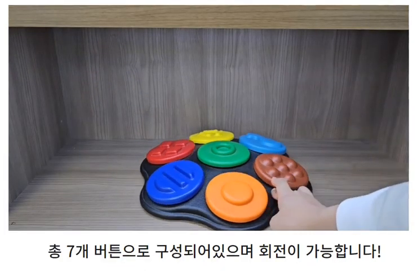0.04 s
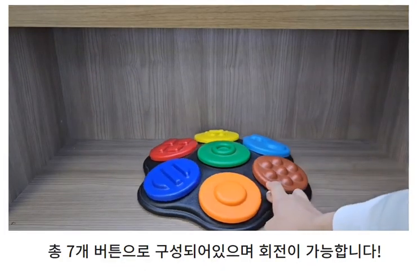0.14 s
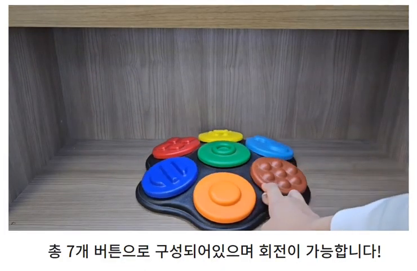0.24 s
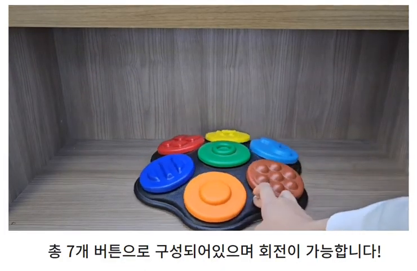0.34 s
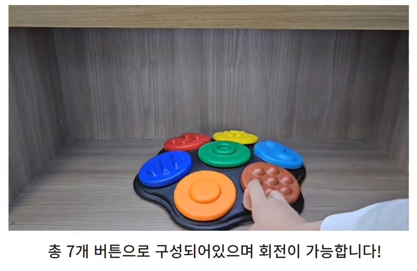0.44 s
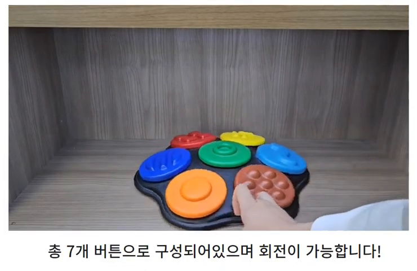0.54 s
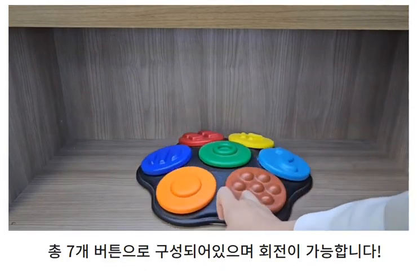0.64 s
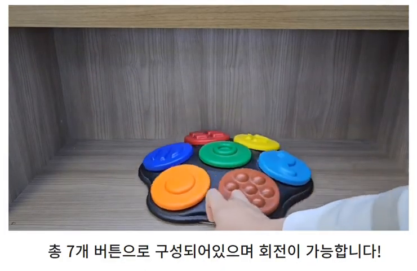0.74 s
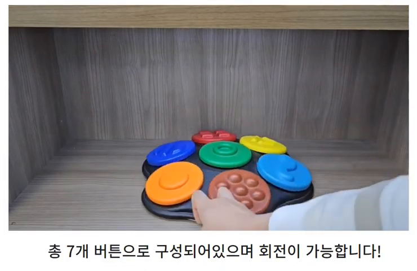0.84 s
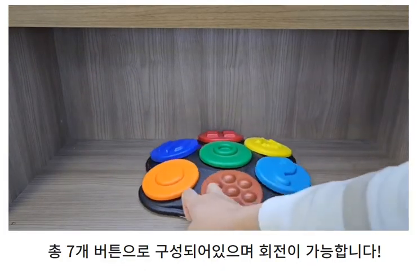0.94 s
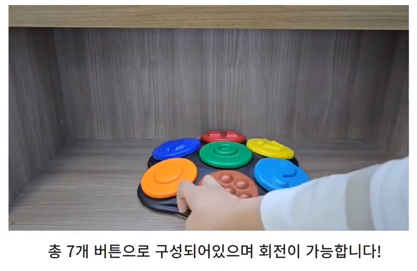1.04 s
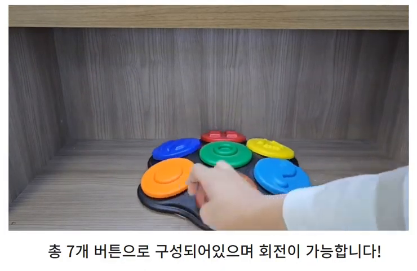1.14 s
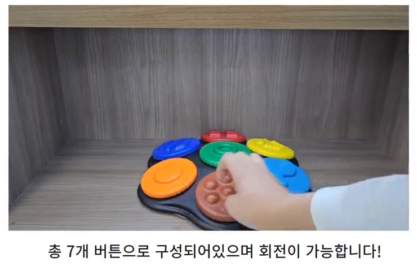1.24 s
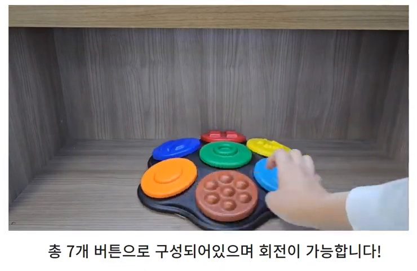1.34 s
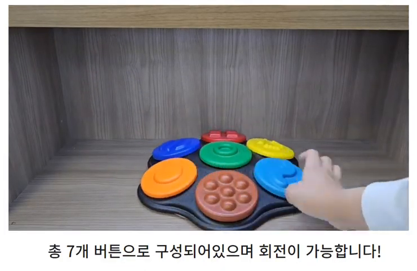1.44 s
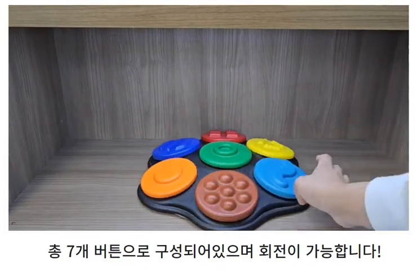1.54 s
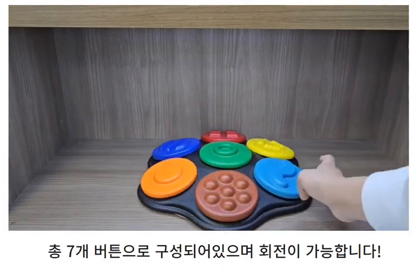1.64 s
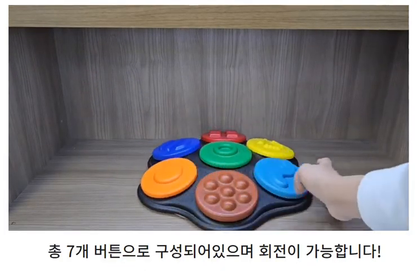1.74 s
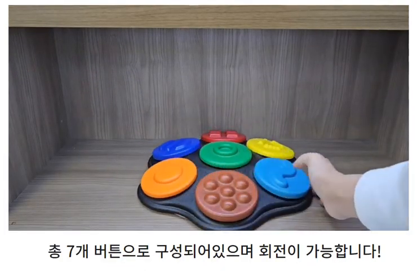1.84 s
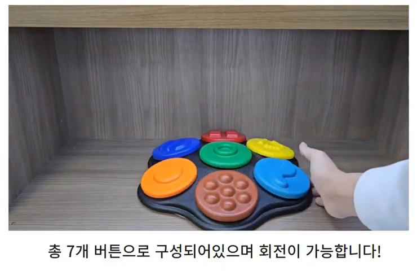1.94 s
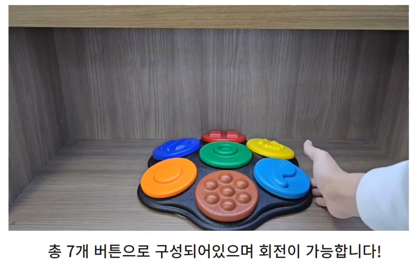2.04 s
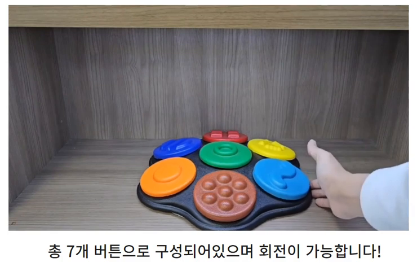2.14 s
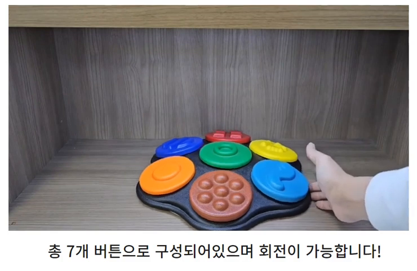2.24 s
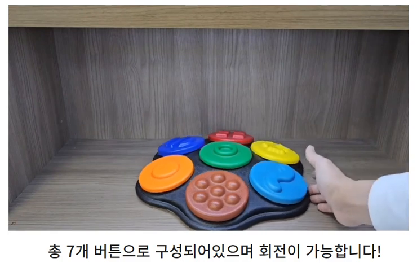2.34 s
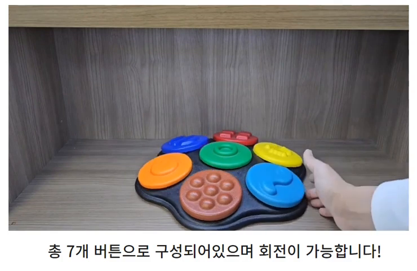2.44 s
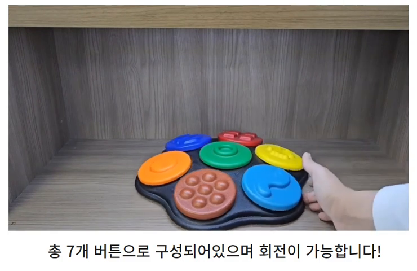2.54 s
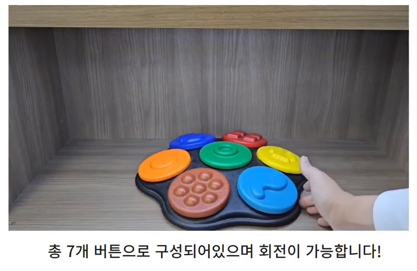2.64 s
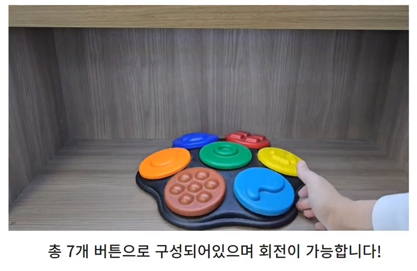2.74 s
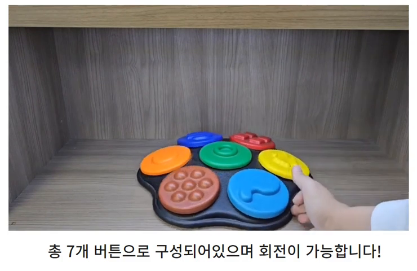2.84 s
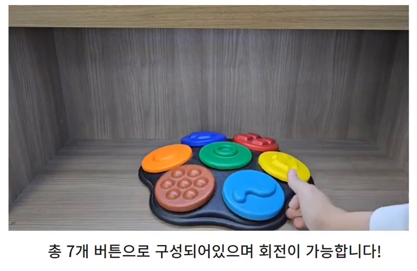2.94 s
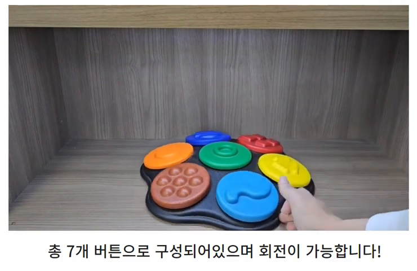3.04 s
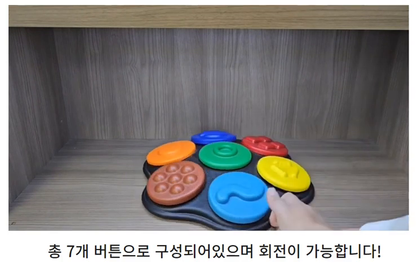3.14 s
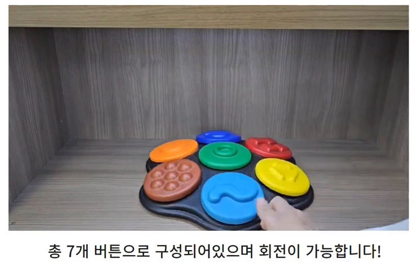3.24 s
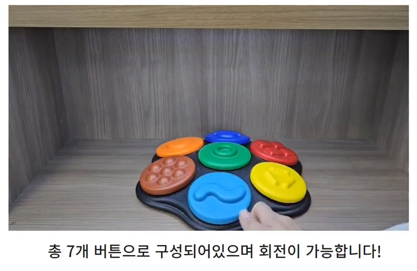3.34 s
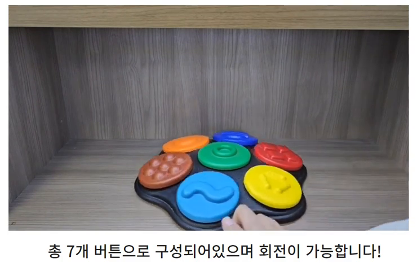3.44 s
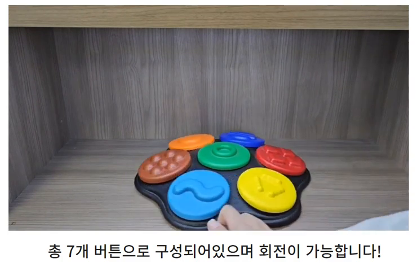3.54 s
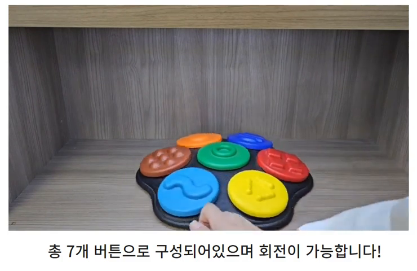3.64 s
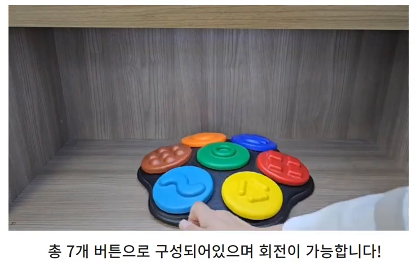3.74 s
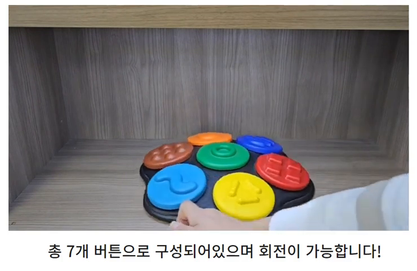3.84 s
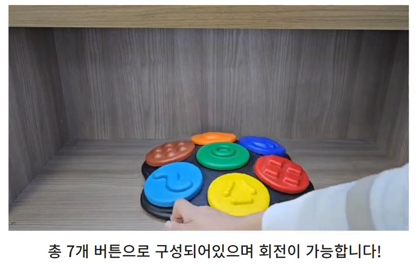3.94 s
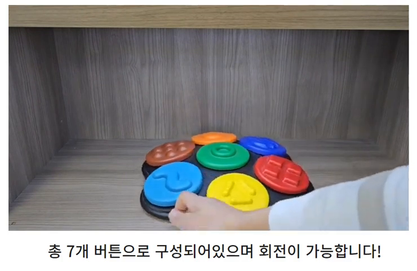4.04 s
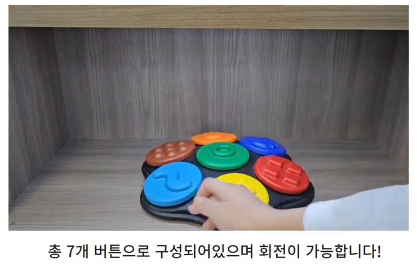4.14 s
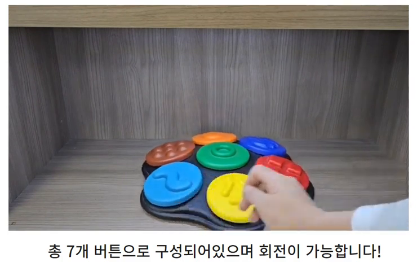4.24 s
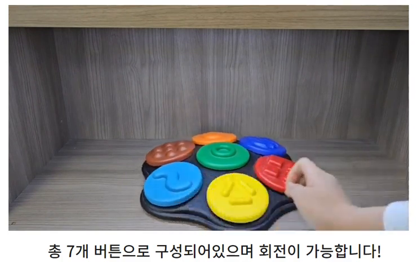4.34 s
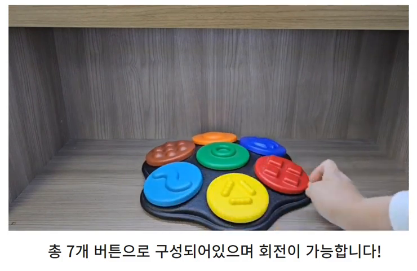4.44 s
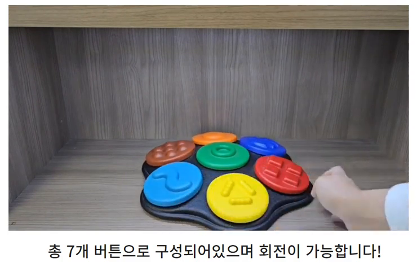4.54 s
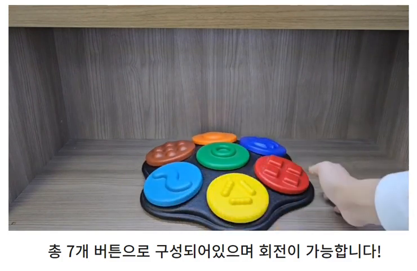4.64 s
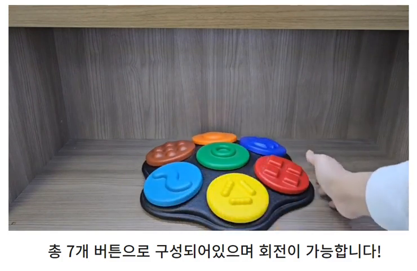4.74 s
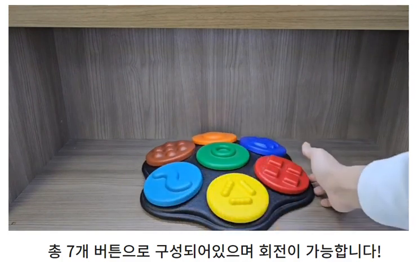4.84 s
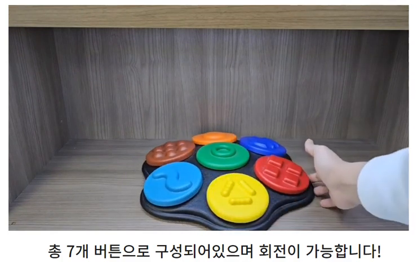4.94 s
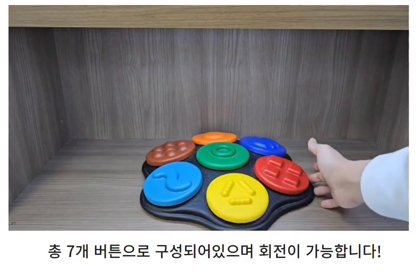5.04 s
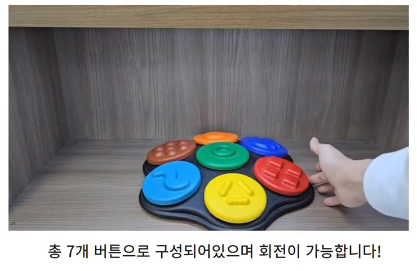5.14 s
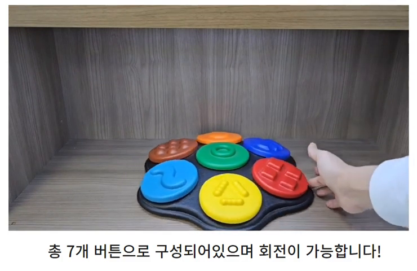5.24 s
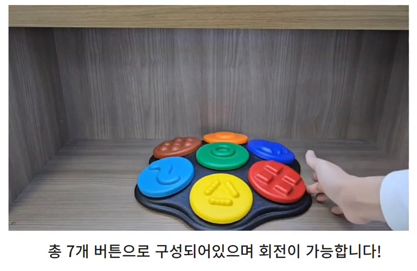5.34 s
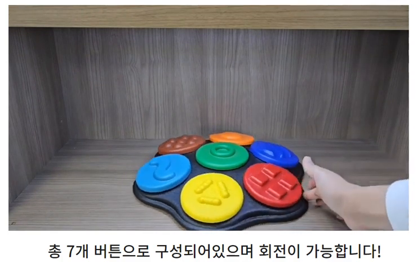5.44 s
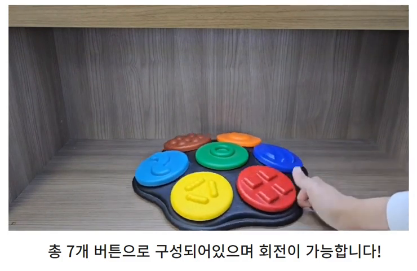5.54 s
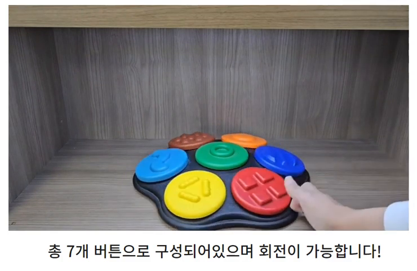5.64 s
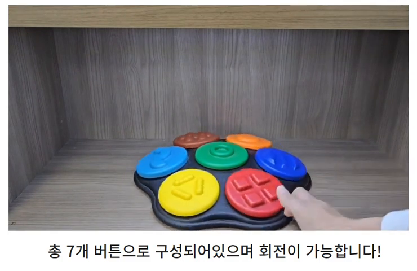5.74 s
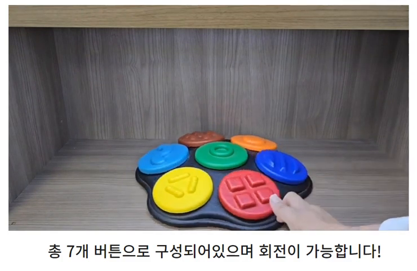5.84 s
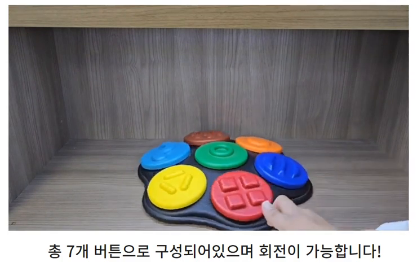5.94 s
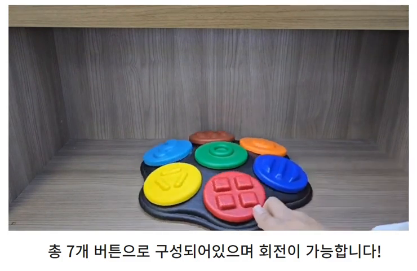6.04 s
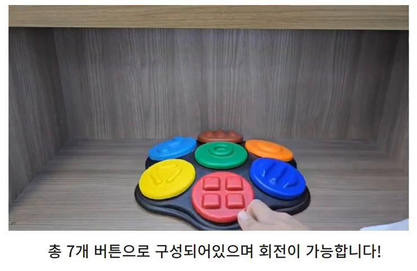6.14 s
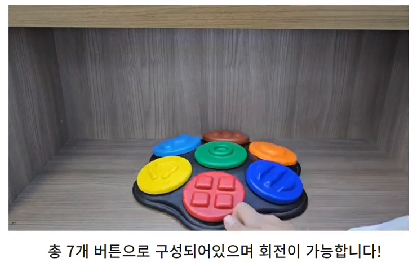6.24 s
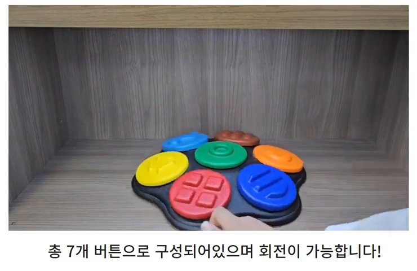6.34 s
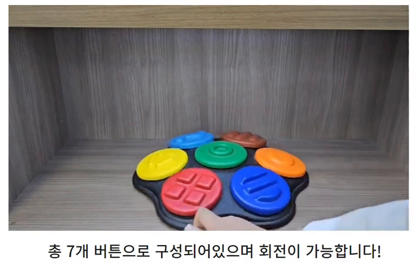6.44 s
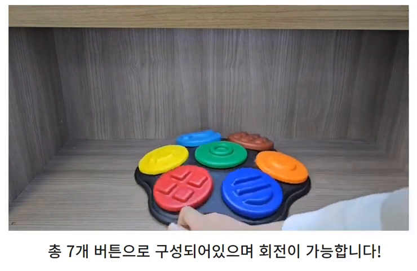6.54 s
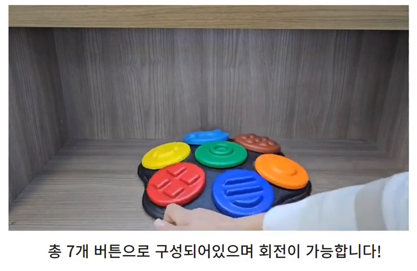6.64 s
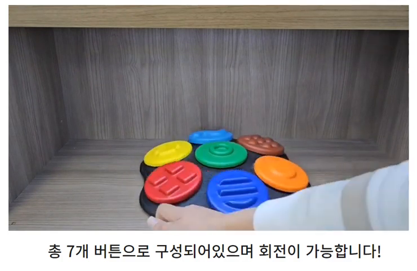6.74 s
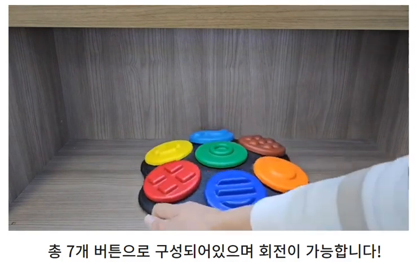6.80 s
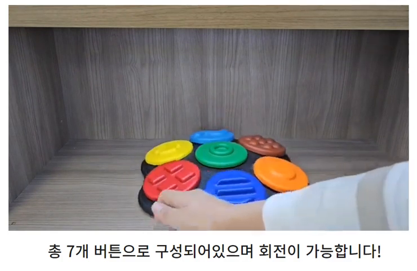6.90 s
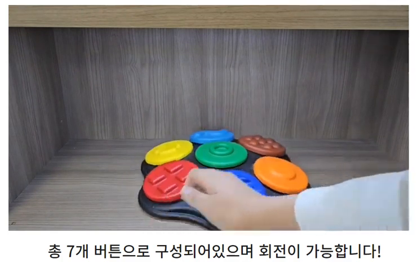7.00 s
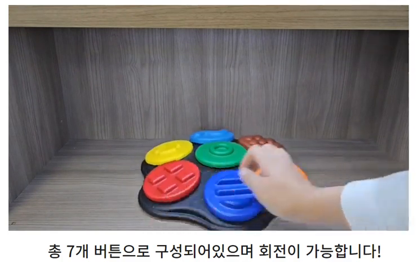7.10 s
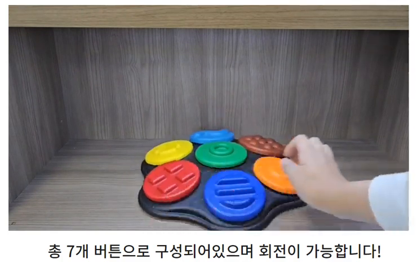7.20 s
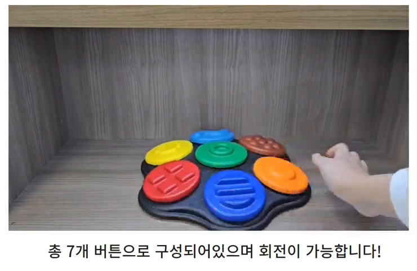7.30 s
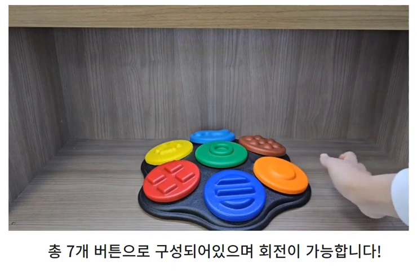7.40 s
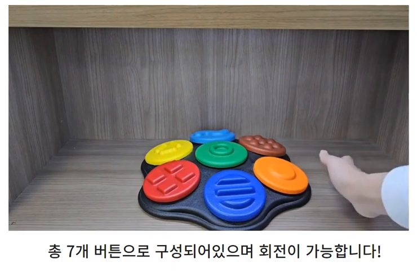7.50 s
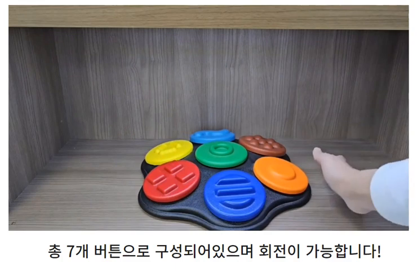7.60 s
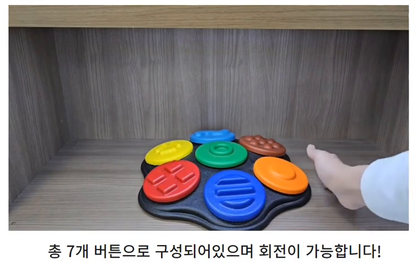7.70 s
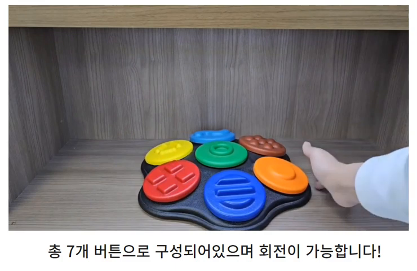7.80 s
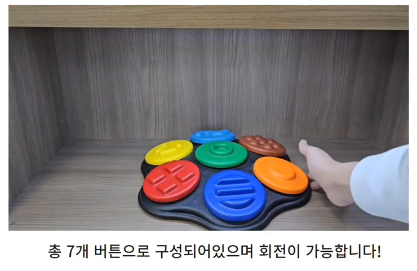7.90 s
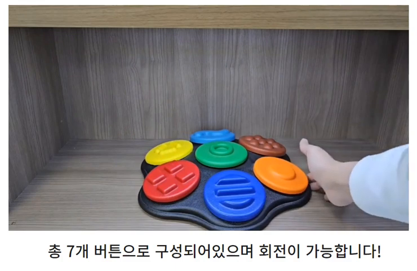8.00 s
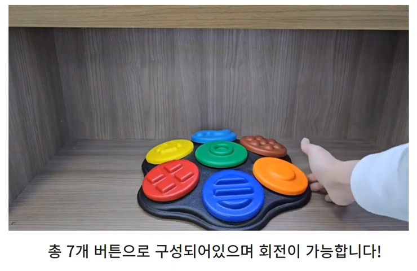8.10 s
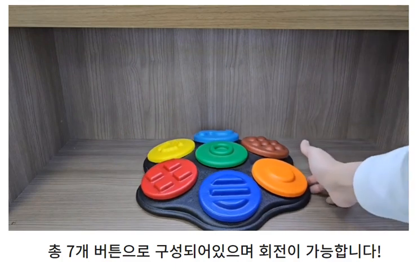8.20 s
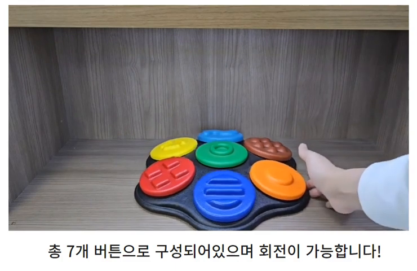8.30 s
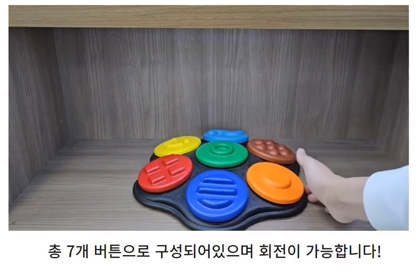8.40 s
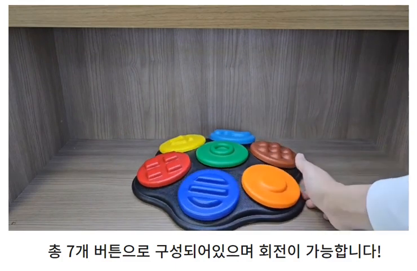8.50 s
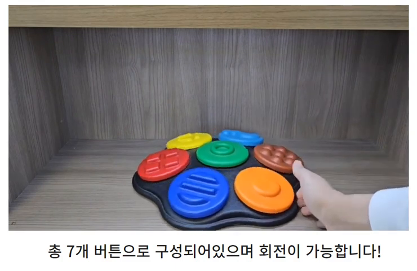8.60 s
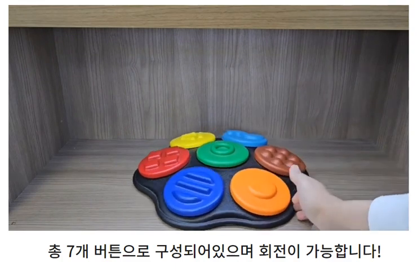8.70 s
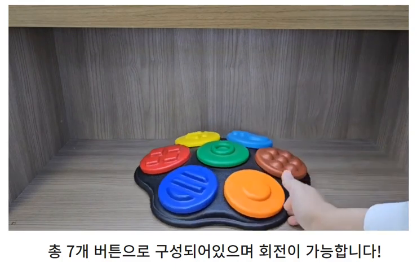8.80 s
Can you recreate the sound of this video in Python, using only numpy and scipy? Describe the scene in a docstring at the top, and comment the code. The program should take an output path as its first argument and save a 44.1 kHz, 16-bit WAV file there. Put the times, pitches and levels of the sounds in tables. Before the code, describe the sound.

Close by, a hollow plastic toy grates over a wooden shelf as a hand rotates it. The rough scrape stutters, ticks and makes the board rumble, then stalls, leaving faint room noise. Three more turns follow, the last two each preceded by a soft brush of skin on plastic. The cabinet walls around it add a very short, boxy reflection.

```python
"""A gritty, hollow scrape: a large plastic disc is dragged round by hand on a wooden shelf, four times.
Its feet stutter over the grain, catch and slip, ringing the hollow body and shaking the shelf into a boom.
A faint low room noise fills the pauses, and a thumb brushes the plastic before the last two pushes.
The walls of the cabinet around the shelf scatter the scrape and the brush into a short, dense tail."""
import sys
import numpy as np
from scipy import signal
from scipy.fft import rfft, irfft, next_fast_len
from scipy.io import wavfile
from scipy.ndimage import uniform_filter1d

SR = 44100
rng = np.random.default_rng(int(sys.argv[2]) if len(sys.argv) > 2 else 0)


def put_to_file(sound):
    """Save the sound as 16-bit audio at rate SR, in the file named by the first command-line argument."""
    columns = np.atleast_2d(sound).T  # one column per channel
    safe = np.clip(columns, -1, 1)
    whole_steps = np.round(safe * 32767)
    wavfile.write(sys.argv[1], SR, whole_steps.astype(np.int16))


N = 390726
T = np.arange(N) / SR
USUAL_DB = -40  # an ordinary scrape; "harder" counts dB above it
# The disc sits to the left: (frequency [Hz], left minus right [dB])
DISC_LEAN = [(60, -1.5), (120, -3.5), (240, 3.5), (480, 4), (950, 4.5), (1890, 3), (3770, 3), (7520, 5.5),
             (15000, 10)]


def gain_of(db):
    return 10 ** (np.asarray(db) / 20)


def evened(x):
    """Scales x to rms 1."""
    return x / np.sqrt(np.mean(x ** 2) + 1e-20)


def read(points, hz):
    """Value of a spectrum table at hz."""
    f, value = np.transpose(points)
    return np.interp(np.log(hz + 1), np.log(f + 1), value)


def columns(strokes):
    """A gate that is open during the strokes, and their columns at every sample."""
    rows = np.concatenate(strokes)
    gate = sum((T >= stroke[0][0]) & (T <= stroke[-1][0]) for stroke in strokes)
    return uniform_filter1d(1. * gate, size=400), [np.interp(T, rows[:, 0], c) for c in rows.T[1:]]


def coloured(x, db_at):
    """Filters x by a gain in dB given as a function of frequency."""
    size = next_fast_len(N)
    return irfft(rfft(x, size) * gain_of(db_at(np.fft.rfftfreq(size, 1 / SR))), size)[..., :N]


def split(x, hz):
    """Low and high part of x, meeting at hz."""
    low = signal.sosfiltfilt(signal.butter(3, hz, fs=SR, output="sos"), x)
    return low, x - low


def pair(left, other, correlation):
    """Two channels from two unrelated signals, as alike as the correlation table says."""
    alike = np.clip(read(correlation, np.fft.rfftfreq(len(left), 1 / SR)), -.99, .99)
    right = irfft(alike * rfft(left) + np.sqrt(1 - alike ** 2) * rfft(other), len(left))
    return np.array([left, right])


def leaning(x, lean):
    """Shares a left-right level difference between the channels."""
    return coloured(x, lambda hz: np.outer([.5, -.5], read(lean, hz)))


def wander(fastest_hz):
    """Slow random drift of rms 1."""
    rates = np.geomspace(fastest_hz / 8, fastest_hz, num=16)
    coarse = T[::64]
    drift = sum(np.sin(2 * np.pi * (hz * coarse + phase)) for hz, phase in zip(rates, rng.random(16)))
    return np.interp(T, coarse, evened(drift))


def grains(per_s, spread_db):
    """Tiny impacts of random sign at random moments, a few of them large."""
    when, size, sign = rng.random(N), rng.exponential(1, N), rng.standard_normal(N)
    return evened((when < per_s / SR) * gain_of(spread_db * np.minimum(size, 5)) * sign)


def shifting(x, depth_db, seconds, width_hz):
    """Makes the colour drift in random patches of time and pitch."""
    spectra = signal.stft(x, nperseg=512, noverlap=384)[2]
    both, left, right = rng.standard_normal((3, *spectra.shape[1:]))
    patches = np.array([both + 0.95 * left, both + right])
    for _ in range(2):
        patches = uniform_filter1d(patches, size=max(round(seconds * SR / 128), 1), axis=2)
        patches = uniform_filter1d(patches, size=max(round(width_hz * 512 / SR), 1), axis=1)
    patch_gain = evened(gain_of(depth_db * evened(patches)))
    return signal.istft(spectra * patch_gain, nperseg=512, noverlap=384)[1][:, :N]


def disc_motion():
    """The four turns: a gate that also fades as the disc stalls, the plain gate, and the scrape level."""
    # How hard the feet grate, one list a turn: (time [s], level [dB])
    turns = [
        [(0.0, -56.5), (0.03, -48.5), (0.29, -37), (0.616, -35.5), (0.674, -40.5), (0.69, -38), (0.87, -39.5),
         (0.898, -44), (0.976, -41), (1.02, -49.5), (1.09, -38), (1.2, -44), (1.224, -35.5), (1.268, -49.5),
         (1.296, -36), (1.33, -44.5), (1.41, -77)],
        [(2.33, -99), (2.41, -49.5), (2.45, -45.5), (2.86, -33), (3.06, -42.5), (3.13, -36), (3.22, -45),
         (3.25, -44), (3.34, -54), (3.41, -35.5), (3.44, -48.5), (3.53, -48.5), (3.58, -34.5), (3.76, -45),
         (3.81, -38), (3.95, -37.5), (3.99, -43), (4.07, -38.5), (4.27, -49), (4.36, -88)],
        [(5.27, -105), (5.306, -66), (5.402, -66), (5.448, -46.5), (5.486, -47.5), (5.602, -29.5),
         (5.756, -32.5), (5.772, -37.5), (5.888, -43.5), (6.38, -44), (6.392, -37), (6.438, -44.5), (6.63, -38),
         (6.65, -35.5), (6.714, -37.5), (6.73, -32.5), (6.83, -30.5), (6.894, -41.5), (7.052, -40.5),
         (7.17, -75.5)],
        [(8.3, -76), (8.38, -64.5), (8.418, -44), (8.5, -39.5), (8.554, -40), (8.566, -35.5), (8.778, -31.5),
         (8.86, -33.5)],
    ]
    stall_db = -52
    gate, (db,) = columns(turns)
    return gate * gain_of(0.21 * np.minimum(db - stall_db, 0)), gate, db


def hand_sweeps():
    """The hand bears on the disc: weight [dB], shelf boom [dB] and time at rest since a sweep [s]."""
    # Each sweep round the disc: (start [s], length [s], shelf boom [dB], weight on the low rub [dB])
    pushes = [(-.3, 1.97, -52, 0.25), (2.352, 2.16, -55, -0.2), (5.37, 1.8, -60.5, 2), (8.36, 2.5, -57, 1)]
    # The low rub swells as the hand comes round to the front: (share of the sweep [0-1], weight [dB])
    weight_arc = [(0, -1), (.3, -0.5), (.62, 6.5), (.85, 1), (1.0, -1.2)]
    start, length, boom_db, sweep_db = np.transpose(pushes)
    now = np.maximum(np.searchsorted(start, T) - 1, 0)
    weight_db = sweep_db[now] + np.interp((T - start[now]) / length[now], *np.transpose(weight_arc))
    return weight_db, boom_db[now], np.maximum(T - (start + length)[now], 0)


def sharpness_db(db):
    """Treble over the scrape level: a harder rub is sharper."""
    return -5 + 0.25 * (db - USUAL_DB)


def sliding_rub():
    """Envelopes of the rub in five bands: hollow body, plate, middle, upper middle, treble."""
    moving, gate, db = disc_motion()
    weight_db, harder = hand_sweeps()[0], db - USUAL_DB
    hollow_db = -54.5 + .68 * harder + weight_db
    plate_db = -50.5 + .7 * harder + .57 * weight_db
    middle_db = db - 4.5 - .043 * harder
    drive = gate * gain_of([hollow_db, plate_db, middle_db, db - 7, db + sharpness_db(db)])
    drive[:2] *= moving  # the low rings die as the disc stalls
    ticks_per_s, tick_db, tick_s = 260, -1, .001  # small random catches roughen the upper bands
    ticks = (rng.random(N) < ticks_per_s / SR) * rng.exponential(1, N)
    tick_power = signal.lfilter([1], [1, -np.exp(-2 / (tick_s * SR))], ticks)
    drive[2:] *= np.sqrt(1 + gain_of(tick_db) ** 2 * tick_power)
    return drive


def foot_slips():
    """A foot catches and snaps free: bursts of power in the five bands of the rub."""
    # Each snap: (time [s], peak level [dB], decay [s])
    snaps = [(.25, -23.5, 0.018), (.51, -22.5, 0.021), (.69, -21, .015), (.766, -26, 0.015),
             (.919, -19.5, 0.0051), (.96, -26, .015), (1.079, -39, .012), (1.214, -31.5, 0.011),
             (1.297, -31, .012), (2.406, -45, 0.0096), (2.605, -22, 0.0062), (2.844, -20, 0.0087),
             (3.12, -30.5, .012), (3.24, -24.5, 0.0071), (3.395, -14, 0.0079), (3.485, -27.5, 0.007),
             (3.586, -24.5, 0.031), (3.638, -30.5, .008), (3.814, -26.5, 0.0042), (3.861, -27.5, .01),
             (4.065, -37, 0.0067), (5.308, -45, .01), (5.44, -33.5, .011), (5.741, -15, 0.0059),
             (6.387, -17, 0.0057), (6.644, -19.5, 0.014), (6.727, -20, 0.015), (6.811, -19.5, 0.012),
             (6.905, -21.5, 0.0061), (6.987, -22.5, 0.022), (7.045, -24, 0.01), (8.333, -60, 0.0046),
             (8.585, -25, 0.011)]
    # A slip that also knocks the hollow body: (time [s], level [dB])
    body_knocks = [(1.296, -41)]
    crest_db, ring_db, rise_s, knock_s = 10, -17, .002, .0041
    age, bursts = T[:SR // 8], np.zeros((5, N + SR))
    for start, peak_db, decay_s in snaps:
        at, db = round(start * SR), peak_db - crest_db
        burst = gain_of(db) * (1 - np.exp(-age / rise_s)) * np.exp(-age / max(decay_s, .002))
        shares = gain_of([ring_db, ring_db, -4, -2.5, sharpness_db(db)])
        bursts[:, at:at + len(age)] += np.outer(shares, burst) ** 2
    for start, db in body_knocks:
        at = round(start * SR)
        bursts[:2, at:at + len(age)] += (gain_of(db) * np.exp(-age / knock_s)) ** 2
    return bursts[:, :N]


def plastic_db(hz, reach):
    """Broad colour of the grit, lifted at the rings; reach is how well one foot drives each ring."""
    # Colour of the grit: (frequency [Hz], density [dB])
    grit_colour = [(180, -36), (300, -13.5), (392, -21.5), (500, -18), (1000, -8), (1750, -3.5),
                   (2570, 0.5), (3900, -3), (5200, -1), (7440, 2.5), (9500, 0), (10300, -6), (13000, -7.5),
                   (16000, -12.5)]
    # Rings of the hollow plastic and dead spots between them: (frequency [Hz], width [Hz], lift [dB])
    plastic_rings = [(466.5, 70, 13.5), (563, 50, 6.5), (771, 90, 7), (1214, 240, 3.5), (1460, 200, 2),
                     (1930, 150, 4), (2132, 170, 3.5), (2570, 310, -6), (1790, 120, -3.5), (993, 130, -5.5),
                     (2860, 340, -3), (3383, 50, 4.5), (4150, 73, 0), (4570, 110, -3), (5600, 500, 0),
                     (7560, 900, 1.5), (11560, 360, 4)]
    lifts = (r * db / (1 + (2 * (hz - f) / width) ** 2) for r, (f, width, db) in zip(reach, plastic_rings))
    return read(grit_colour, hz) + sum(lifts)


def grating_feet(feet=8):
    """Each foot stutters over the wood grain, rings the plastic and is heard by its own path."""
    drive = np.sqrt(sliding_rub() ** 2 + foot_slips())
    scrape, stutter_db = 0, wander(36)
    reaches = rng.uniform(-1, 1, (feet, 17))  # one for each ring and dead spot
    for reach in 0.88 + (reaches - reaches.mean(0)):
        crunch = coloured(grains(per_s=6000, spread_db=1.3), lambda hz: plastic_db(hz, reach))
        low, high = split(crunch, 2780)
        middle, high = split(high, 5560)
        bands = np.array([evened(band) for band in (*split(low, 1000), middle, *split(high, 9500))])
        load = evened(gain_of(2.2 * wander(25)))  # the feet take the load in turn
        foot = load * gain_of(stutter_db) * (drive * bands).sum(0)
        scrape = scrape + cabinet(foot / np.sqrt(feet), direct_db=-2.5)
    scrape = shifting(scrape, depth_db=3, seconds=.07, width_hz=120)  # contact points come and go
    return leaning(scrape, DISC_LEAN)


def cabinet(x, direct_db):
    """Direct sound and a dense short tail off the walls, different left and right."""
    # Decay between the walls: (frequency [Hz], time to fall 60 dB [s])
    wall_t60 = [(300, 0.16), (1500, 0.076), (5000, 0.054), (15000, 0.049)]
    # Stereo likeness in the cabinet: (frequency [Hz], correlation [-1 to 1])
    likeness = [(60, 1), (180, 0.86), (550, 0.09), (1650, 0.055), (4970, 0.14), (15000, 0.089)]
    hz, t, z = signal.stft(rng.standard_normal((2, SR // 4)), SR, nperseg=128)
    tails = signal.istft(z * gain_of(-60 * t / read(wall_t60, hz)[:, None]), SR, nperseg=128)[1]
    tails /= np.linalg.norm(tails, axis=1)[:, None]
    tails[[0, 1], rng.integers(0, 12, size=2)] += gain_of(direct_db)  # arrivals a few samples apart
    lead, length = 256, SR // 6  # samples
    spectra = rfft(np.roll(pair(*tails, likeness), lead, axis=1))
    broad_colour = np.sqrt(uniform_filter1d(abs(spectra) ** 2, size=40, axis=1))
    tails = irfft(spectra / broad_colour, tails.shape[1])[:, :length]
    tails *= signal.windows.tukey(length, .06)
    return signal.fftconvolve(x[None], tails / np.linalg.norm(tails[0]), axes=1)[:, lead:lead + N]


def shelf_boom():
    """The dragged weight shakes the board at its lowest modes: a boom with a buzz above it."""
    # Modes of the board: (frequency [Hz], density [dB])
    board_colour = [(13, -39.5), (22, -22), (44, -7.5), (60, 6), (76, -2), (120, -1.5), (165, -8),
                    (225, -4.5), (278, -7.5), (329, -28), (400, -19), (520, -45.5), (880, -120)]
    # Stereo likeness of the board: (frequency [Hz], correlation [-1 to 1])
    likeness = [(40, .93), (100, 1), (250, 0.48), (500, .3)]
    # The buzz sits to the left: (frequency [Hz], left minus right [dB])
    board_lean = [(60, 0), (125, 1), (300, 4)]
    # The thumb lands and bumps the shelf: (time [s], level [dB])
    touches = [(4.85, -57), (8.015, -70)]
    touch_s = .0087
    moving, _, db = disc_motion()
    weight_db, boom_db, _ = hand_sweeps()
    shake = coloured(pair(*rng.standard_normal((2, N)), likeness), lambda hz: read(board_colour, hz))
    boom, buzz = split(leaning(shake, board_lean), 105)
    harder = uniform_filter1d(db - USUAL_DB, size=2000)
    boom_level = moving * gain_of(boom_db + .4 * harder + .6 * weight_db + 2.4 * wander(12))
    buzz_level = moving * gain_of(-56 + .59 * harder + weight_db + 1.5 * wander(30))
    bumps = sum((T > s) * gain_of(bump_db) * np.exp(-abs(T - s) / touch_s) for s, bump_db in touches)
    return boom_level * evened(boom) + (bumps + buzz_level) * evened(buzz)


def room_air():
    """A lumpy rumble that sinks throughout, a faint rustle that sinks in each pause, and a thin hiss."""
    # Colour of the room tone: (frequency [Hz], density [dB])
    air_colour = [(13, -47), (22, -17), (48, -7), (70, -1.5), (106, -15.5), (152, -25.5), (215, -19.5),
                  (328, -31), (420, -28.5), (885, -35.5), (2000, -40.5), (5000, -42.5), (9000, -52.5),
                  (10800, -55), (11400, -48.5), (16000, -47.5)]
    # Stereo likeness of the room tone: (frequency [Hz], correlation [-1 to 1])
    likeness = [(60, 0.97), (180, 0.81), (550, 0.16), (1650, -0.076), (4970, -0.72), (15000, 0.57)]
    # The room tone sits to the left: (frequency [Hz], left minus right [dB])
    air_lean = [(60, 2), (240, 6.5), (950, 3.5), (3770, 7.5), (15000, 8)]
    rumble_db_per_s, rustle_db_per_s = -.96, -5.5
    noise = coloured(pair(*rng.standard_normal((2, N)), likeness), lambda hz: read(air_colour, hz))
    rumble, upper = split(evened(noise), 180)
    rustle, hiss = split(upper, 2500)
    rumble = rumble * gain_of(7.5 + rumble_db_per_s * T + .91 * wander(2.3))
    rustle = rustle * gain_of(4 + rustle_db_per_s * hand_sweeps()[2] + 1.1 * wander(33))
    hiss = shifting(hiss, depth_db=2.5, seconds=.05, width_hz=340)
    return leaning(gain_of(-62.5) * (rumble + rustle + hiss), air_lean)


def thumb_brush(spots=4):
    """Skin slides softly over the plastic, touching at a few spots."""
    # One list a brush: (time [s], level [dB], brightness [dB])
    brushes = [
        [(4.82, -94, -13), (4.84, -93, 5), (4.854, -71.5, -1), (4.882, -77, 1), (4.99, -75, -2),
         (5.04, -70.5, 3), (5.154, -68.5, -7), (5.172, -84, -26), (5.2, -102, -5)],
        [(7.98, -88.5, 7), (8.02, -66, 11), (8.04, -62, 6), (8.164, -65.5, -6), (8.202, -68.5, -9),
         (8.244, -61.5, -1.5), (8.288, -99, -13), (8.3, -84, -3)],
    ]
    # Colour of skin on plastic: (frequency [Hz], density [dB])
    skin_colour = [(210, -50), (350, -26), (443, -3.5), (554, -24), (642, 0.5), (766, -15), (915, -9.5),
                   (1380, -7.5), (1510, -1), (1780, -12), (2000, -6.5), (5560, -13), (12000, -28.5),
                   (15600, -42), (22000, -120)]
    # The lowest ring gains what the next one loses: (time [s], tilt [dB])
    ring_tilt = [(4.85, 14), (4.98, 11), (5.04, 4), (5.16, 1), (8.06, -1), (8.2, -7)]
    gate, (db, bright_db) = columns(brushes)
    depth = gain_of(np.interp(T, *np.transpose(ring_tilt)))
    brush = 0
    for _ in range(spots):
        rub = coloured(grains(per_s=8000, spread_db=1.3), lambda hz: read(skin_colour, hz))
        low, high = split(rub, 1660)
        lowest_ring, above = split(evened(low), 540)
        next_ring, middle = split(above, 730)
        body = middle + lowest_ring * depth + next_ring / depth
        spot = gate * gain_of(db + 1.4 * wander(37)) * (body + gain_of(bright_db) * evened(high))
        brush = brush + cabinet(spot / np.sqrt(spots), direct_db=-5)
    return leaning(shifting(brush, depth_db=3, seconds=.06, width_hz=170), DISC_LEAN)


def scene():
    return grating_feet() + shelf_boom() + thumb_brush() + room_air()


def record(dry):
    """A steep low-pass takes off the very top of the treble."""
    edge_hz = 15850
    taps = signal.firwin(1023, edge_hz, window=("kaiser", 10), fs=SR)
    return signal.oaconvolve(dry, taps[None], "same")


dry = scene()
out = record(dry)
put_to_file(out)
```